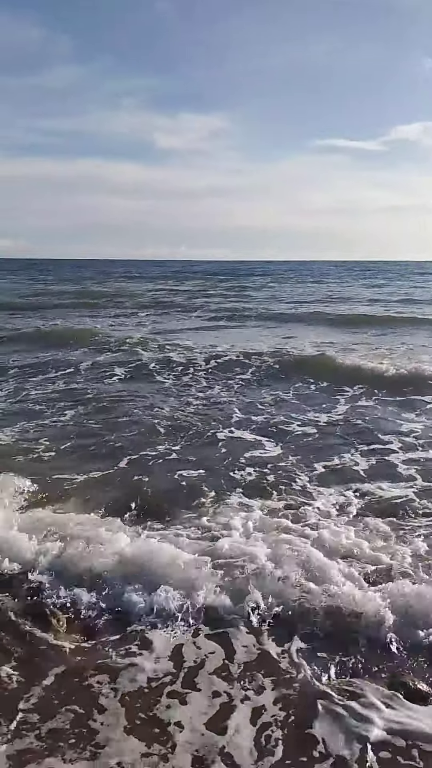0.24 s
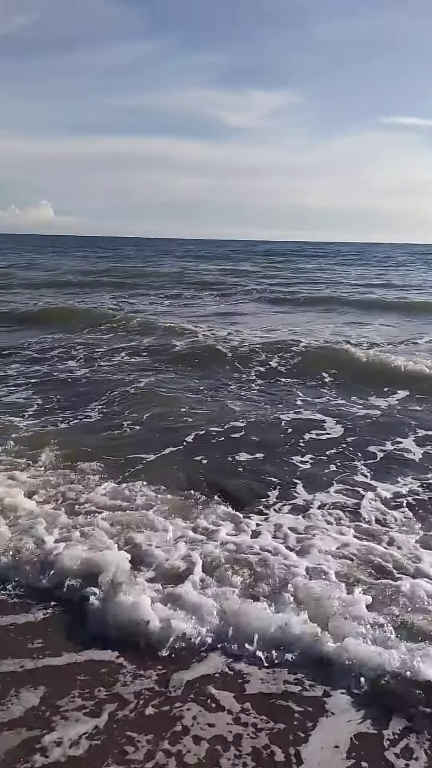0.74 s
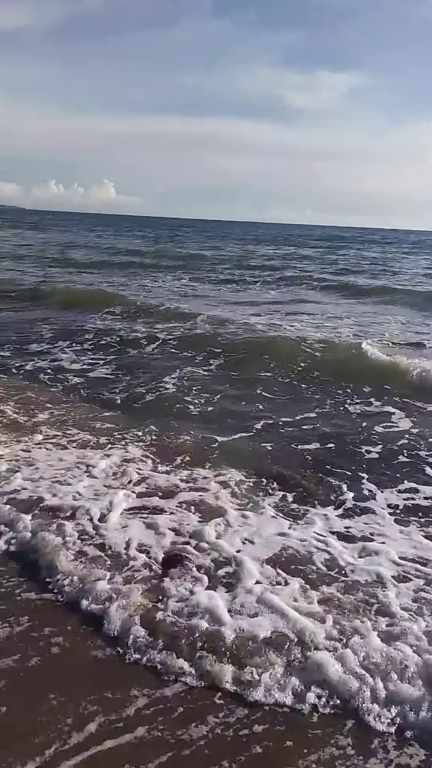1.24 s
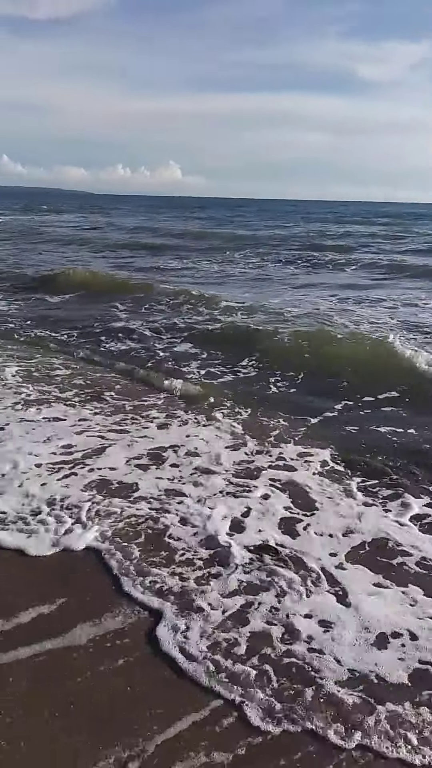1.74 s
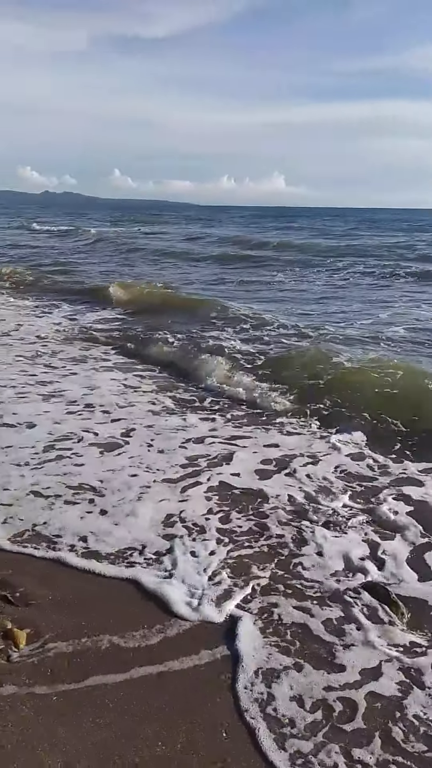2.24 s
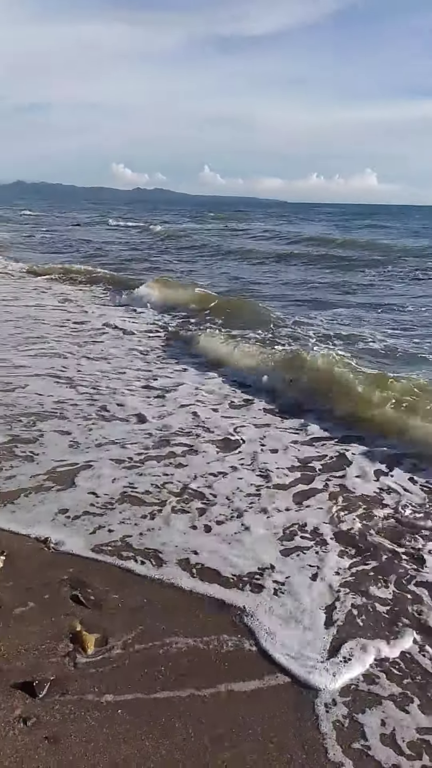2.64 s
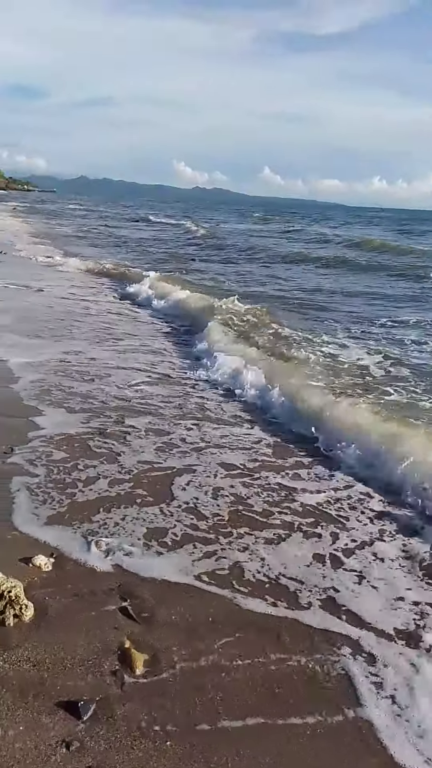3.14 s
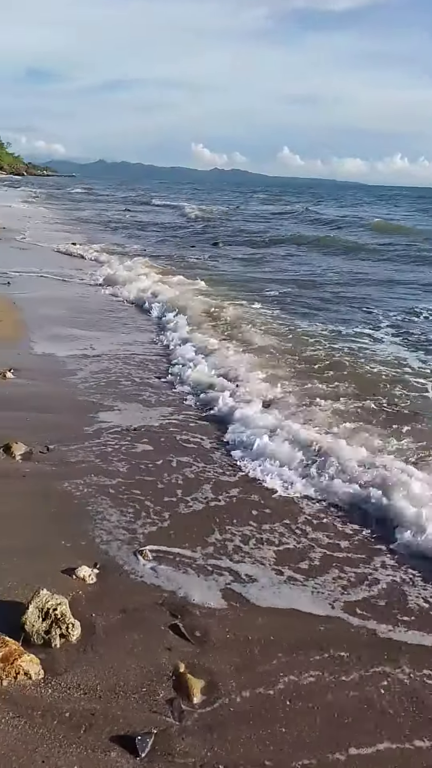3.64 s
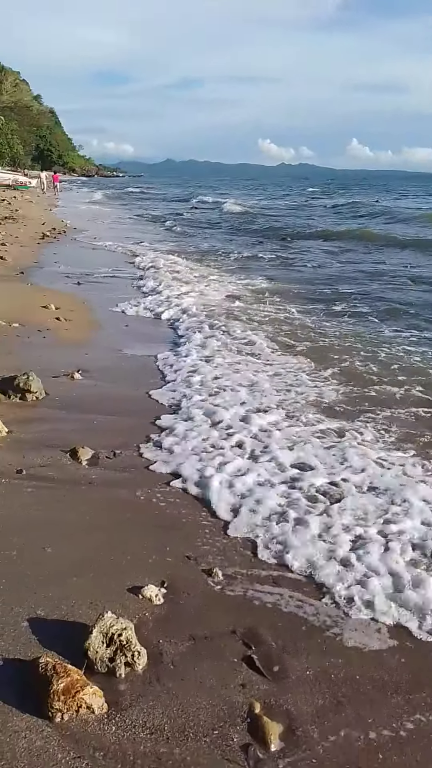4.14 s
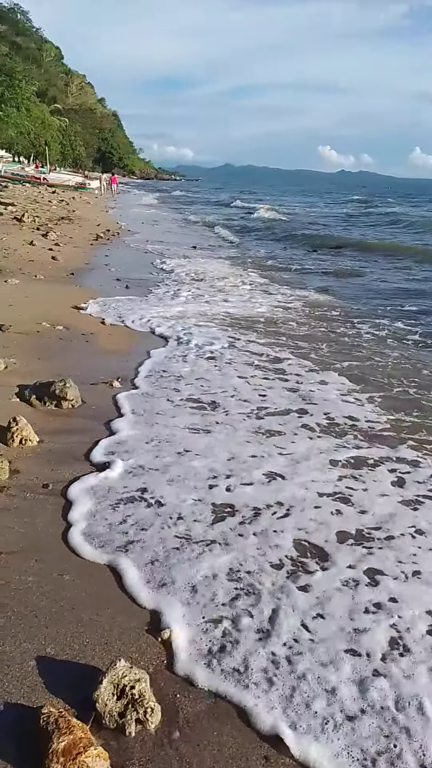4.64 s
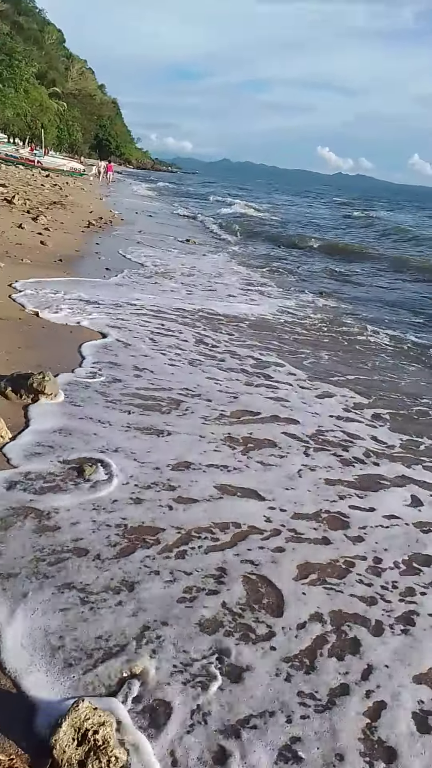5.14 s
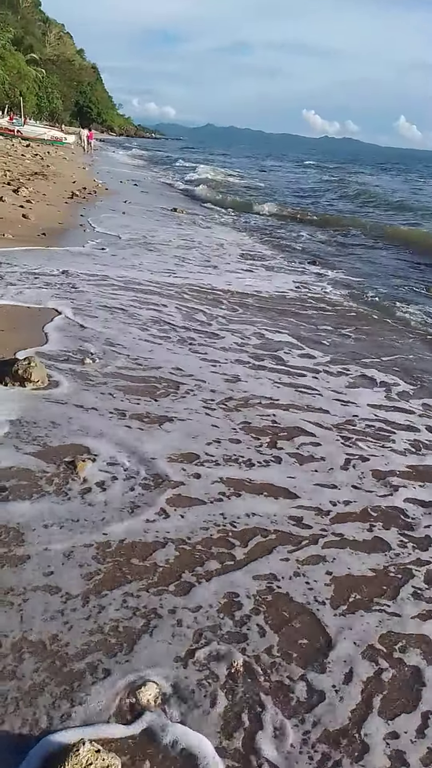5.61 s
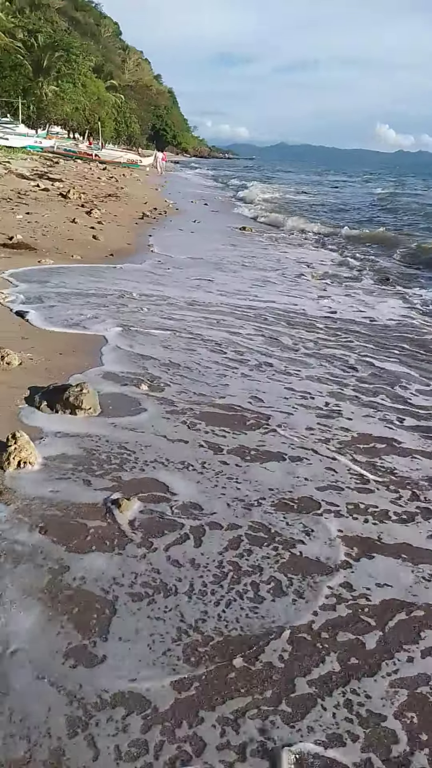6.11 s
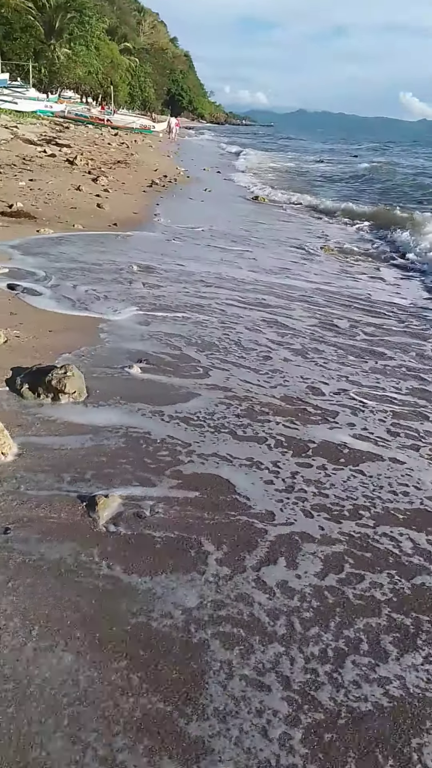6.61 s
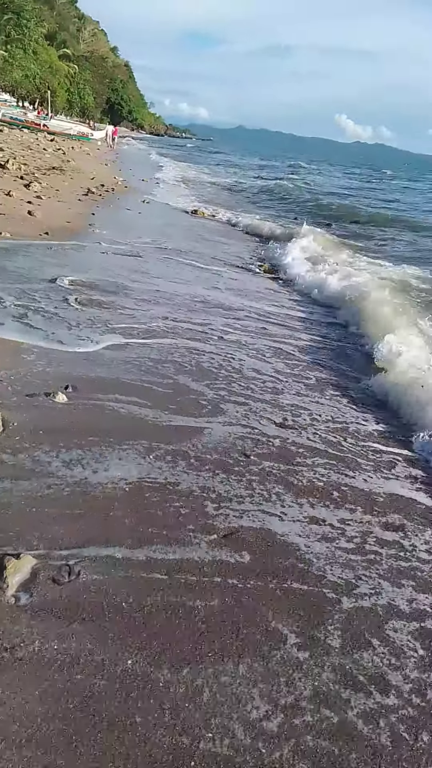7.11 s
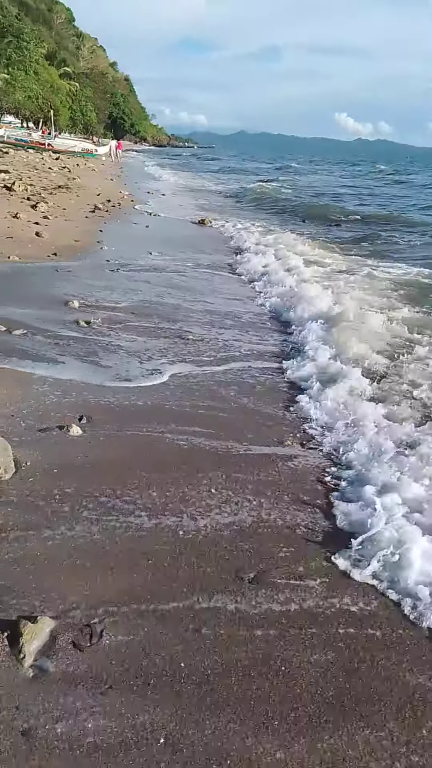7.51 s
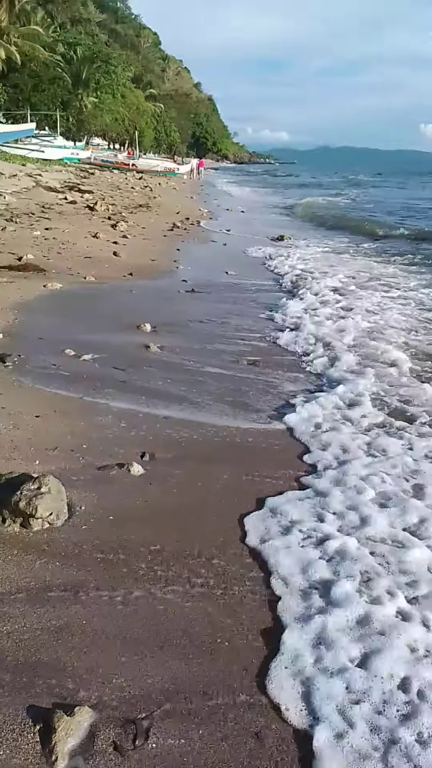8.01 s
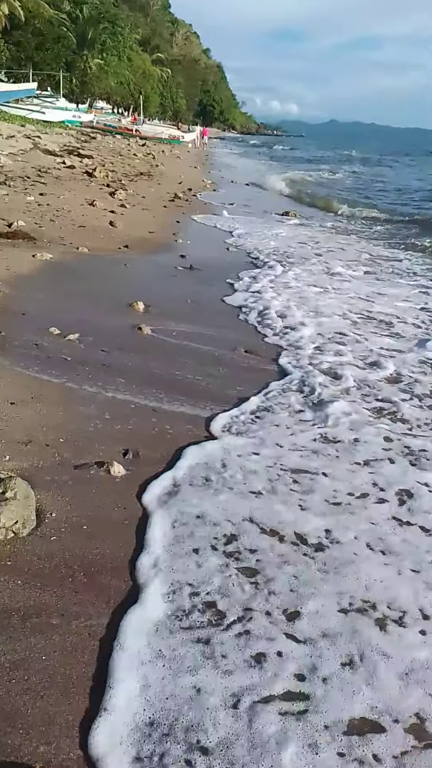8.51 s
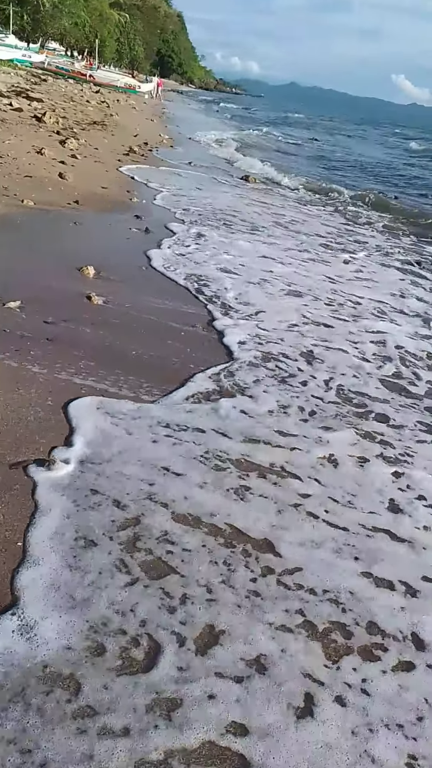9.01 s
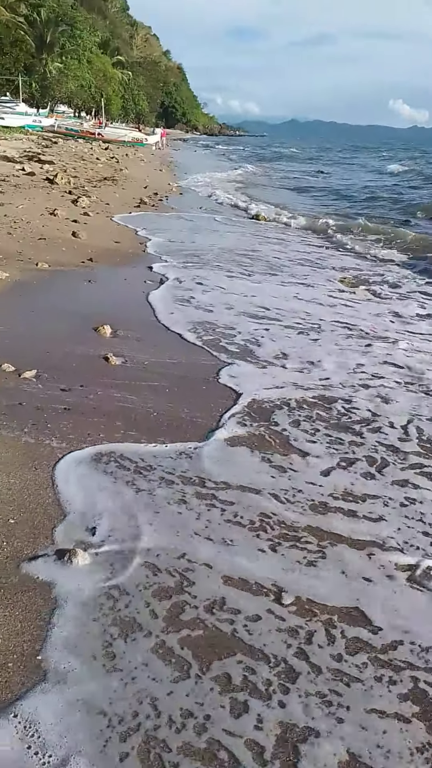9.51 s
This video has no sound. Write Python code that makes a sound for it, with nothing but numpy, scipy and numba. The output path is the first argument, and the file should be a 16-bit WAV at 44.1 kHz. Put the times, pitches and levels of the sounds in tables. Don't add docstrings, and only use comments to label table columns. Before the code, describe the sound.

Small waves break a few metres away on a sandy beach. A full, rushing surf opens loud, eases to a foamy hiss, swells again as the next wave rolls in, sinks, then surges once more before softening. Bubbly gurgle, fine spray and tiny splashes ride over a constant water roar. Light breeze rumbles faintly on a hand-held phone microphone, its top treble dulled.

```python
import sys
import numpy as np
from scipy import signal
from scipy.fft import rfft, irfft
from scipy.io import wavfile
from scipy.ndimage import uniform_filter1d
from numba import njit

SR = 44100
rng = np.random.default_rng(int(sys.argv[2]) if len(sys.argv) > 2 else 0)


def how_loud(loudness_db):
    steps = np.asarray(loudness_db, float) / 20
    return 10 ** steps


def dump_mix(stems):
    frames = np.atleast_2d(stems).T
    limited = np.clip(frames, -1, 1)
    pcm = np.round(limited * 32767).astype(np.int16)
    wavfile.write(sys.argv[1], SR, pcm)


N = 430416
HZ = np.fft.rfftfreq(N, 1 / SR) + 1e-3
TIME_S = np.arange(N) / SR


def unit(x):
    return x / np.sqrt(np.mean(x ** 2))


def curves(table):
    s, *columns = np.transpose(table)
    return np.array([np.interp(TIME_S, s, column) for column in columns])


def colour(x, points):
    hz, db = np.transpose(points)
    return rfft(x) * how_loud(np.interp(np.log(HZ), np.log(hz), db))


def walk(rate_hz):
    hold = int(SR / rate_hz)
    steps = np.repeat(rng.standard_normal(N // hold + 1), hold)
    smooth = uniform_filter1d(uniform_filter1d(steps, hold), hold)
    return unit(smooth[:N])


def swells_db(events):
    return sum(db * np.exp(-.5 * ((TIME_S - s) / length_s) ** 2) for s, db, length_s in events)


@njit
def ring(start, hz, cycles, glide, gain):
    y = np.zeros(N)
    for j in range(len(start)):
        w = 2 * np.pi * hz[j] / SR
        n = min(int(4 * cycles * SR / hz[j]), N - start[j])
        z = gain[j] + 0j
        step = np.exp(1j * w - hz[j] / (cycles * SR))
        rise = np.exp(1j * w * glide * hz[j] / (cycles * SR))
        for i in range(n):
            y[start[j] + i] += z.imag
            z *= step
            step *= rise
    return y


def bubbles(count, low_hz, high_hz, cycles, glide, scatter_db):
    when, pitch, luck = rng.random((count, 3)).T
    hz = low_hz + (high_hz - low_hz) * pitch
    gain = how_loud(-scatter_db * np.log(luck + 1 / 500)) * np.sqrt(hz)
    return unit(ring((when * N).astype(np.int64), hz, 1. * cycles, 1. * glide, gain))


# pitch_hz, level_db (per Hz)
SEA_COLOUR = [(60, -41), (110, -21), (170, -14.5), (222, -4.5), (294, 1.2), (447, -2.5), (605, -0.5),
              (917, -0.3), (1220, -2.5), (1500, -2), (1900, -2.5), (2250, -3.5), (2600, -4), (3300, -7.5),
              (17000, -10.5)]
CLOUD_HZ = [300, 700, 1550, 2800, 4700, 7600, 10500, 14000]


def surf():
    roar = rng.standard_normal(N)
    gurgle = bubbles(count=50000, low_hz=179.1, high_hz=4498, cycles=2.96, glide=0.085, scatter_db=2.0)
    fizz = bubbles(count=50000, low_hz=6150, high_hz=17000, cycles=2.7, glide=0.055, scatter_db=2.0)
    water = colour(roar + how_loud(-8) * gurgle + how_loud(-7) * fizz, SEA_COLOUR)
    cloud_db = clouds_db()
    cloud_db -= 20 * np.log10(np.sqrt(np.mean(how_loud(cloud_db) ** 2, axis=1, keepdims=True)))
    facing_db, peak_facing_db, turn_s = 3, 3.5, .7
    facing = np.exp(-.5 * (TIME_S / turn_s) ** 2)
    slosh, spatter, out = walk(9), walk(30), 0
    for octave in np.arange(6, 14.4, 1 / 3):
        window = np.cos(np.pi / 2 * np.clip(3 * (np.log2(HZ) - octave), -1, 1)) ** 2
        band = irfft(water * window, N)
        place = np.interp(octave, np.log2(CLOUD_HZ), np.arange(8))
        share = np.clip(1 - abs(np.arange(8) - place), 0, 1)
        bright = place / 7
        restless_db = bright * (0.12 * slosh + 0.21 * spatter + 0.77 * walk(20)) + .5 * walk(5)
        port = np.clip(1 - 2 * abs(octave - 12.2), 0, 1)
        peak = np.isclose(octave, 12)
        port_db = facing * (facing_db * port + peak_facing_db * peak)
        out = out + band * how_loud(share @ cloud_db + port_db + restless_db + splashes_db(octave))
    return unit(out) * how_loud(-26)


# start_s, level_db
SURF_FORCE = [(0.0, -23.5), (0.41, -23), (1.5, -30), (2.36, -30), (2.5, -28), (3.42, -25), (4.84, -32),
              (5.84, -29.5), (6.41, -25.5), (6.77, -25.5), (7.09, -23), (7.61, -26.5), (7.77, -30.5),
              (8.26, -32), (8.86, -29.5), (9.3, -30.5), (9.73, -29), (9.76, -30)]
FOLLOW = [1.27, 1.06, 0.9, 0.89, 0.99, 0.94, 0.92, 0.78]


def clouds_db():
    force_db = curves(SURF_FORCE)[0]
    return np.outer(FOLLOW, force_db) + spray_db() + rolls_db() + swash_db() + plunges_db()


# pitch_hz, level_db (per Hz)
RUMBLE = [(12, -40), (25, -22), (35, -18), (60, -3.5), (72, -4), (98, 0.5), (135, -5), (170, -14),
          (230, -40), (330, -90)]
# start_s, lift_db, length_s
GUSTS = [(.14, 3, .1), (.7, 2, .15), (1.08, 10, 0.14), (1.4, 7, .06), (1.96, 6.5, .08), (2.5, 5.5, 0.17),
         (3.34, 4, .08), (4.2, 3.5, 0.13), (5.85, 5.5, 0.063), (6.18, -5, .15), (6.61, 11, .025),
         (6.8, 4, .1), (7.45, 5.5, 0.089), (8.05, -2.5, .12), (8.68, 9.5, .08), (8.95, 11, .05),
         (9.15, -4.5, .08), (9.55, 0, .08), (9.76, 8, .06)]


def breeze():
    level_db, easing_db_per_s = -55.5, -0.87
    rumble = unit(irfft(colour(rng.standard_normal(N), RUMBLE), N))
    return rumble * how_loud(level_db + easing_db_per_s * TIME_S + swells_db(GUSTS) + .6 * walk(12))


def treble_gaps(x, share=.035, depth_db=-18):
    hz, _, frames = signal.stft(x, SR, nperseg=1024)
    band = (hz // 690).astype(int)
    empty = rng.random((band.max() + 1, frames.shape[-1] // 3 + 1)) < share
    empty = np.repeat(empty, 3, axis=1)[band, :frames.shape[-1]]
    empty = empty & (hz[:, None] > 12400)
    return signal.istft(frames * how_loud(depth_db * empty), SR, nperseg=1024)[1][:, :N]


# start_s, pitch_hz, rise_db
SPLASHES = [(0.027, 5500, 2), (0.197, 1800, 2.5), (0.234, 12000, 1), (0.654, 8500, 2), (1.457, 12000, 3),
            (1.542, 12000, 4), (1.728, 3200, 1), (2.123, 12000, -4), (2.148, 3200, 1.5), (2.579, 8500, 1.7),
            (2.917, 8500, 0), (3.647, 5500, 1), (3.998, 2800, 2), (4.771, 12000, 1), (5.193, 5500, 2),
            (5.945, 12000, 2.5), (6.01, 1000, 2), (6.302, 8500, 1), (6.347, 5500, 1), (6.364, 302, 6),
            (6.887, 1800, 1), (6.981, 8500, 0), (7.1, 3200, 2), (7.14, 12000, 3.5), (7.157, 1800, 1.8),
            (8.123, 1800, 2.5), (8.911, 5500, 3), (8.964, 3200, 1.8)]


def splashes_db(octave, length_s=0.0074, reach_octaves=0.69, boost=1.56):
    s, hz, db = np.transpose(SPLASHES)
    t = np.arange(0, N, 64) / SR
    near_db = boost * db * np.exp(-.5 * ((np.log2(hz) - octave) / reach_octaves) ** 2)
    lift_db = near_db @ np.exp(-.5 * ((t - s[:, None]) / length_s) ** 2)
    return np.interp(TIME_S, t, lift_db)


# start_s, pitch_hz (band centre)
PUFFS = [(0.12, 9300), (0.353, 14800), (0.516, 11000), (0.527, 8600), (1.189, 8600), (1.191, 6250),
         (1.191, 14000), (2.025, 7560), (2.373, 7580), (2.631, 7250), (2.631, 14400), (3.027, 7000),
         (3.709, 12300), (3.721, 5600), (4.186, 4700), (4.186, 7550), (4.207, 10700), (4.299, 5730),
         (4.718, 6860), (4.813, 6260), (5.091, 6900), (5.787, 10350), (6.272, 9000), (6.948, 9000),
         (7.063, 6050), (8.345, 6600), (8.528, 6300), (9.036, 4700), (9.039, 7580), (9.365, 7580)]


def side_puffs(mid):
    side, frame, offset = np.zeros(N), 2048, 250
    level_db = 3
    hz = np.fft.rfftfreq(frame, 1 / SR)
    window = np.hanning(frame)
    for s, centre_hz in PUFFS:
        start = offset + 1024 * round((s * SR - offset) / 1024 - 1)
        width_hz = 670 + .14 * centre_hz
        inside = abs(hz - centre_hz) < width_hz / 2
        band = abs(rfft(mid[start:start + frame] * window)) * inside
        puff = irfft(band * np.exp(2j * np.pi * rng.random(len(hz))), frame)
        side[start:start + frame] += how_loud(level_db) * puff * window
    return side * np.array([[1], [-1]])


# start_s, lift_db, length_s
SPRAYS = [
    (0.25, 3, .15),
    (2.3, 1, .2),
    (3.3, 1, 0.15),
    (5.4, 0.5, 0.34),
    (7.05, 2.5, 0.27),
    (8.2, 1.5, 0.29),
    (4.2, -1.5, .2),
    (6.5, -0.5, .2),
]
SPRAY_SHARE = [0, 0, 0, 0.092, 0.27, 0.28, 1.2, .95]


def spray_db():
    return np.outer(SPRAY_SHARE, swells_db(SPRAYS))


# start_s, lift_db, length_s
ROLLS = [
    (.5, 1.2, 0.19),
    (2.75, 2.5, 0.11),
    (3.2, 2.5, 0.22),
    (3.85, 3, .15),
    (5.8, .8, .15),
    (6.7, 1.5, 0.11),
    (7.05, 2, 0.081),
    (8.4, -1, 0.28),
    (9.2, -0.5, .2),
]
ROLL_SHARE = [0.064, 1.14, -0.23, 0.048, -0.48, 0, 0, 0]


def rolls_db():
    return np.outer(ROLL_SHARE, swells_db(ROLLS))


# start_s, lift_db, length_s
SWASHES = [
    (1.4, -1.3, .15),
    (3.05, 1, .2),
    (4.45, 1.5, .3),
    (5.3, -0.5, .2),
    (6.15, 1.7, .12),
    (7.1, 1.5, .15),
    (7.6, 1.2, 0.11),
    (8.15, -1.3, 0.18),
    (9.2, 0.5, .2),
]
SWASH_SHARE = [0.081, -0.039, -0.6, 0.99, .2, -0.1, 0, 0]


def swash_db():
    return np.outer(SWASH_SHARE, swells_db(SWASHES))


# start_s, lift_db, length_s
PLUNGES = [
    (1.65, 2.5, 0.17),
    (2.7, 0.5, 0.11),
    (3.85, -1.5, .15),
    (6.38, 1, 0.21),
    (6.85, 2, .15),
    (8.75, 2.5, .15),
    (9.65, 0.5, 0.14),
]
PLUNGE_SHARE = [0.96, 0.19, 0, 0, 0.15, 0, 0, 0]


def plunges_db():
    return np.outer(PLUNGE_SHARE, swells_db(PLUNGES))


def scene():
    return np.tile(surf() + breeze(), (2, 1))


# pitch_hz, level_db
PORT = [(3300, 1.33), (3700, -1), (4400, -1.5), (4650, -4.5), (4950, -5), (5400, -5.5), (6200, -6.5),
        (7000, -14.5), (7900, -20.5), (10000, -21.5), (11500, -25), (13200, -31), (15000, -27),
        (17000, -33)]


def microphone(dry):
    null_hz, null_width_hz = 164, 46
    heard = np.array([irfft(colour(x, PORT), N) for x in dry])
    return signal.lfilter(*signal.iirnotch(null_hz, null_hz / null_width_hz, SR), heard)


def top_cut(x):
    return signal.sosfilt(signal.butter(12, 15740, fs=SR, output="sos"), x)


def record(dry):
    heard = microphone(dry)
    mix = treble_gaps(heard) + side_puffs(heard[0])
    return top_cut(mix)


dry = scene()
out = record(dry)
dump_mix(out)
```